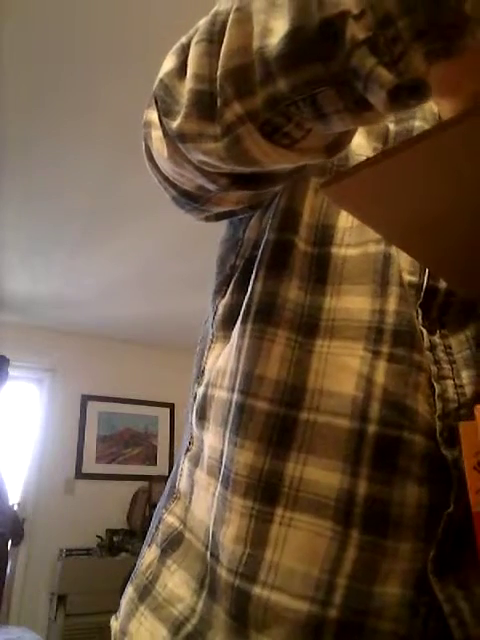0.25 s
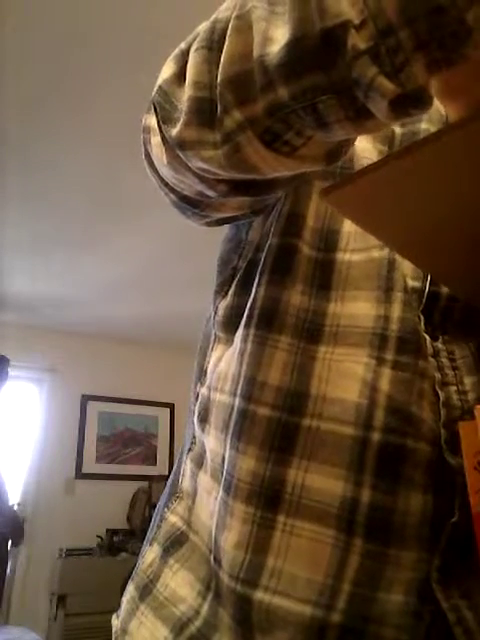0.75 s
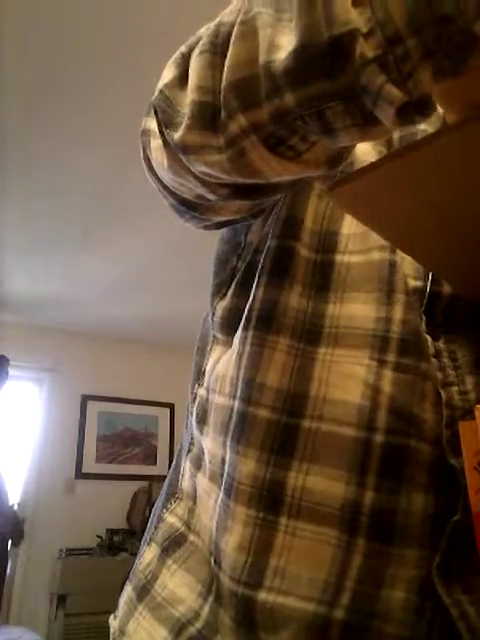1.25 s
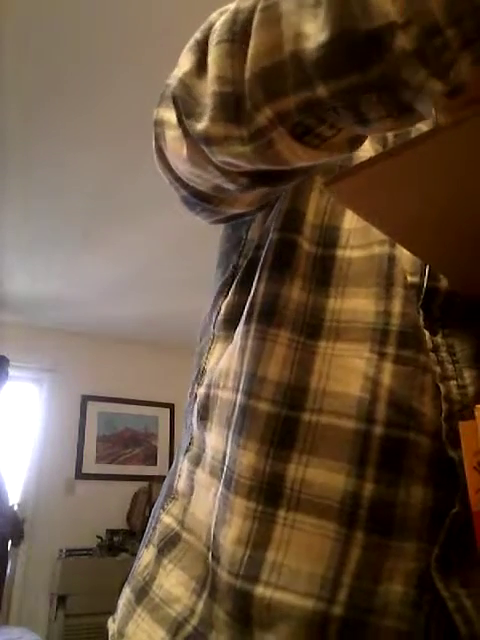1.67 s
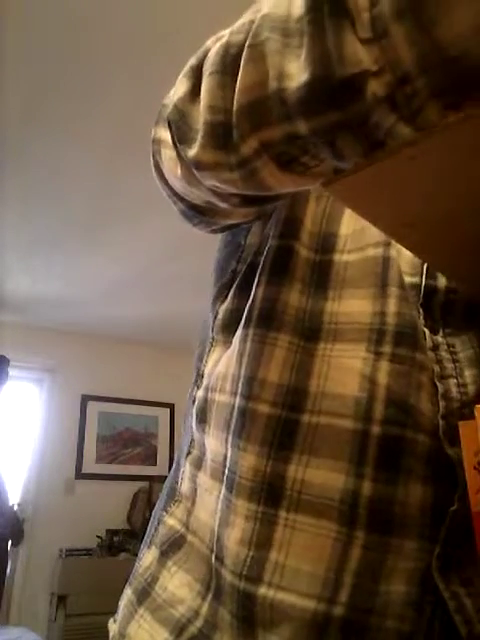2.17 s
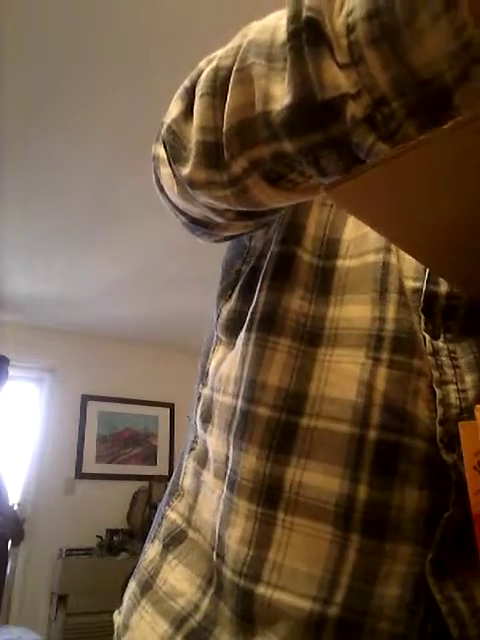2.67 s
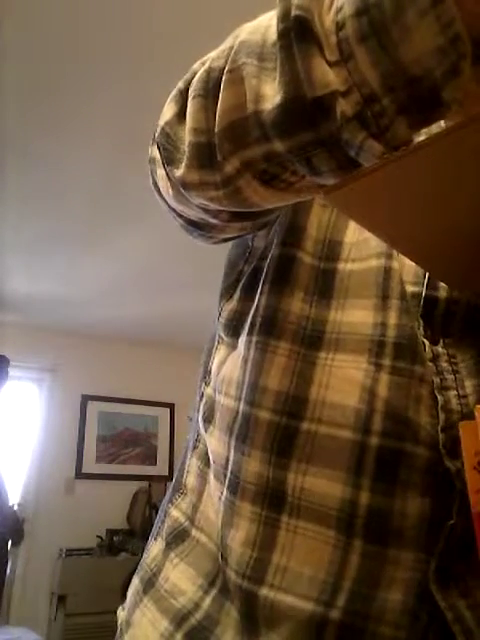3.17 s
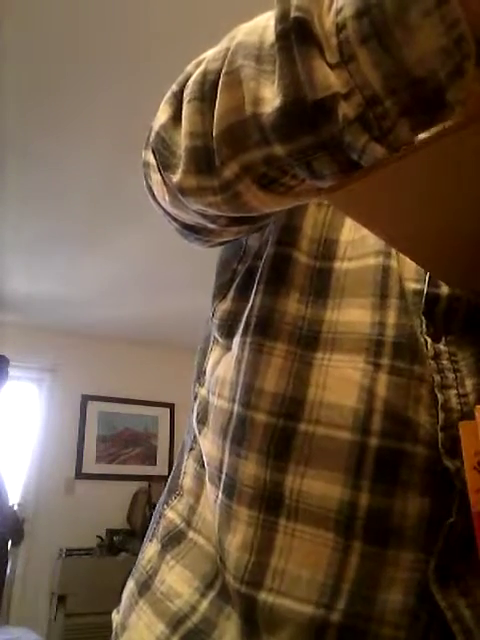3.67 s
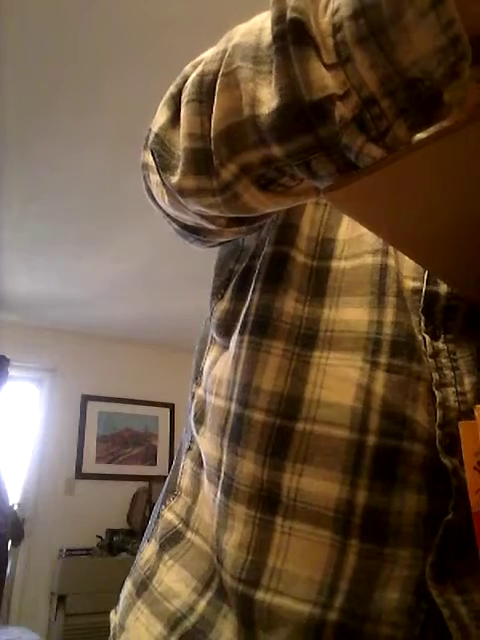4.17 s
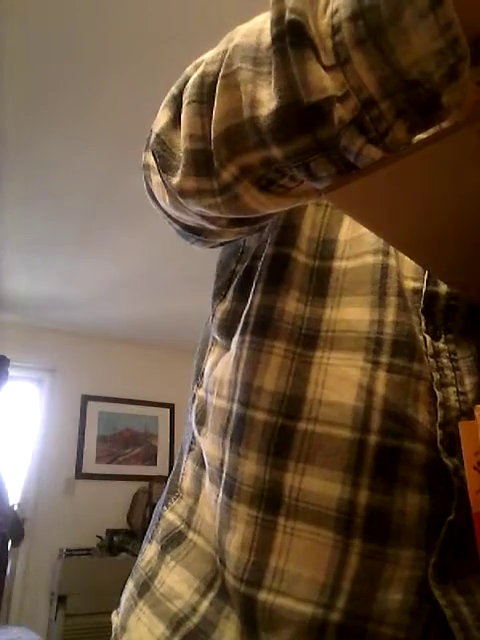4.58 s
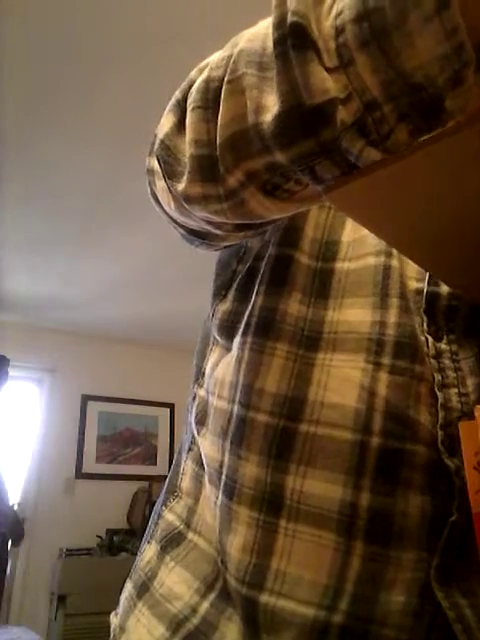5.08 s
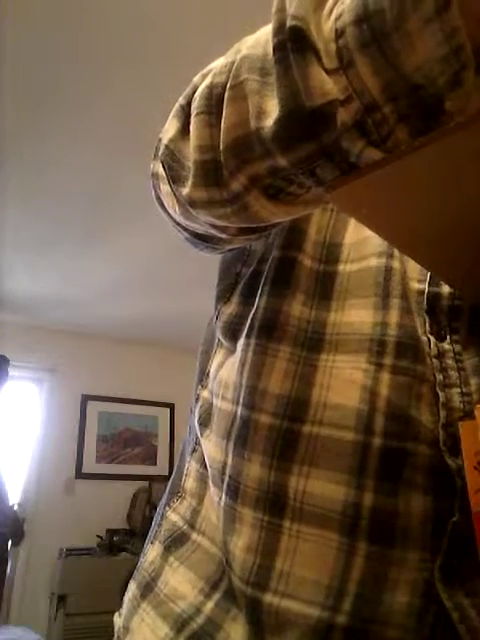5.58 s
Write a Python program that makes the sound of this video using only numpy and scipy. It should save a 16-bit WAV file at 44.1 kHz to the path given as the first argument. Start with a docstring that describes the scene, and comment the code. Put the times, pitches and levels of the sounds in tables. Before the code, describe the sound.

Close, right-leaning sound of cans and packets being shifted in a cardboard box. Short dry scrapes run almost continuously over a very faint room background. Boxy knocks come early, sliding dominates the middle, a sharp loud cluster of bangs lands past four seconds, and smaller thuds, a strong scrape and a last soft knock finish. Short, damped indoor echoes.

```python
"""Someone rummages through groceries in a cardboard box, close by and to the right, in a living room.
Over a faint diffuse background, goods slide from the start: streams of tiny slips excite the box.
Cans and cartons soon knock as well, each blow summing decaying modes, a panel slap and a noisy crack.
From half a second on, deep noise bursts shudder now and then; after a second, packets crinkle in
short bursts of snaps. The hardest blows fall past four seconds, and a last one ends the scene."""
import sys
import numpy as np
from scipy import signal
from scipy.fft import rfft, irfft
from scipy.io import wavfile
from scipy.ndimage import uniform_filter1d

SR = 44100
rng = np.random.default_rng(int(sys.argv[2]) if len(sys.argv) > 2 else 0)


def file_out(sig):
    """Save sig as 16-bit WAV at sys.argv[1]."""
    # one column per channel
    cols = np.atleast_2d(sig).T
    # limit, then scale
    lim = np.clip(cols, -1, 1)
    pcm = np.round(lim * 32767).astype(np.int16)
    wavfile.write(sys.argv[1], SR, pcm)


N = 257984
TIME = np.arange(N) / SR
HIT_TIME = TIME[:SR // 3]   # seconds since a blow, also the span of one echo pattern


def from_db(db):
    """Amplitude gain is the exponential of a level in decibels."""
    return 10 ** (np.asarray(db) / 20)


def rms_one(x):
    """Normalization to unit mean power."""
    return x / np.sqrt(np.mean(x ** 2) + 1e-20)


def blow_one(x):
    """Normalization of a transient to unit mean power over its first 25 ms."""
    return x / np.sqrt(np.mean(x[:SR // 40] ** 2) + 1e-20)


def at_hz(points, hz):
    """Linear interpolation of a table on a log-frequency axis."""
    f, value = np.transpose(points)
    return np.interp(np.log(np.maximum(hz, 1)), np.log(f), value)


def butter(x, hz, kind, order=2):
    """Causal Butterworth filtering."""
    return signal.sosfilt(signal.butter(order, hz, kind, fs=SR, output="sos"), x)


def colour(x, spectrum, size=2048):
    """Minimum-phase filtering: folding the cepstrum makes a given spectrum causal."""
    bins_hz = np.arange(size // 2 + 1) * SR / size
    cepstrum = irfft(np.log(from_db(at_hz(spectrum, bins_hz))))
    cepstrum[1:size // 2] *= 2
    cepstrum[size // 2 + 1:] = 0
    response = irfft(np.exp(rfft(cepstrum)))
    return signal.fftconvolve(x, response)[:len(x)]


def drift(rate):
    """Slow random modulation: smooth wander of unit spread through `rate` random points a second."""
    knots = rng.standard_normal(N // 20)
    return rms_one(np.interp(TIME * rate, np.arange(len(knots)), knots))


def resonate(x, hz, width):
    """Two-pole resonance with unit gain at its peak."""
    r = np.exp(-np.pi * width / SR)
    zeros = np.array([1, 0, -1]) * (1 - r * r) / 2
    poles = [1, -2 * r * np.cos(2 * np.pi * hz / SR), r * r]
    return signal.lfilter(zeros, poles, x)


def grains(per_s, spread_db):
    """Shot noise: impulses at random times, of uneven size and random sign."""
    sizes = from_db(spread_db * np.minimum(rng.exponential(1, N), 4))
    occurs = rng.random(N) < per_s / SR
    return rms_one(occurs * sizes * rng.choice([-1, 1], N))


def bursts(table):
    """Gating: a gain that is open during each row of start, length and level."""
    return sum(from_db(db) * ((TIME > s) & (TIME < s + length)) for s, length, db in table)


def ring(modes, weights, t, vary):
    """Modal superposition: each mode decays along t, its strength varying with the place of contact."""
    hz, db, t60 = np.array(modes).T[:, :, None]
    strength = 1 + vary * rng.uniform(-1, 1, (len(modes), 1))
    decay = from_db(db - 60 * t / t60)
    return weights @ (strength * decay * np.sin(2 * np.pi * hz * HIT_TIME))


# Likeness of diffuse sound at the two ports. Each row: frequency in Hz, correlation from -1 to 1.
LIKENESS = [(100, 0.66), (300, 1), (700, 0.91), (1400, -0.55), (3000, 0.35), (8000, -0.11)]


def diffuse_bands(size):
    """Diffuse-field coherence: yield (Hz, stereo noise) in half-octave bands of set correlation."""
    edges = np.geomspace(22, 17000, 20)
    for low, high in zip(edges, edges[1:]):
        mid, side = butter(rng.standard_normal((2, size)), [low, high], "band")
        hz = np.sqrt(low * high)
        alike = np.clip(at_hz(LIKENESS, hz), -1, 1)
        yield hz, np.sqrt(1 + alike) * mid + np.sqrt(1 - alike) * side * [[1], [-1]]


# Colour of the background. Each row: frequency in Hz, relative gain of the noise in dB.
BACKGROUND_COLOUR = [(25, 2), (60, 1.5), (130, 7.5), (300, -8.5), (1000, -6), (3500, -12.5), (7000, -20.5),
                     (15000, -18.5)]
BACKGROUND_DB = -65


def room_tone():
    """Stationary noise: a steady, faint diffuse background."""
    tone = sum(from_db(at_hz(BACKGROUND_COLOUR, hz)) * band for hz, band in diffuse_bands(N))
    return from_db(BACKGROUND_DB) * rms_one(tone)


STOP_DB_PER_S = 268   # how fast friction dies when a stroke ends


def stroke(start, run_up, hold, power=0.84):
    """Friction noise grows with sliding speed, holds, and dies as the thing comes to rest."""
    speed = np.clip((TIME - start) / run_up, 0, 1)
    after_hold = np.maximum(TIME - start - run_up - hold, 0)
    return speed ** power * from_db(-STOP_DB_PER_S * after_hold)


# Strokes, each one thing dragged along the cardboard. Each row: start in seconds, run-up in seconds,
# hold in seconds, then levels of surface hiss, panel rub and wall drumming in dB before their trims.
STROKES = [(0.0, 0.065, 0.14, -57.5, -53.5, -52), (0.233, .12, 0.16, -49.5, -53.5, -58),
           (0.56, 0.037, 0.11, -55, -55.5, -55), (0.892, 0.073, 0.014, -60, -61, -57),
           (1.146, 0.037, 0.017, -52, -50.5, -43), (1.202, 0.022, 0.052, -59.5, -57.5, -54),
           (1.276, 0.056, 0.12, -55, -63, -51), (1.372, 0.085, 0.097, -51, -63.5, -57),
           (1.63, .02, 0.0088, -55.5, -76, -62), (1.699, .01, 0.048, -55, -70, -61),
           (1.749, 0.038, 0.038, -57, -58.5, -61), (1.838, 0.06, 0.028, -50.5, -71, -48),
           (2.042, 0.052, 0.013, -46, -49, -41), (2.117, .02, .03, -51.5, -52.5, -55),
           (2.194, 0.084, 0.067, -60, -62, -55.5), (2.347, 0.11, 0.038, -52, -51.5, -53),
           (2.517, .1, 0.11, -50, -51, -57), (2.662, 0.15, .15, -46.5, -46.5, -49.5),
           (2.981, 0.039, 0.1, -52.5, -55.5, -50.5), (3.2, 0.15, 0.15, -47.5, -53.5, -64),
           (3.501, 0.1, .015, -47.5, -49.5, -65), (3.66, 0.027, .02, -50, -54, -48.5),
           (3.895, 0.056, 0.013, -57.5, -54, -53.5), (3.998, 0.026, 0.022, -53.5, -59, -55),
           (4.114, 0.047, 0.095, -53.5, -50, -47.5), (4.239, 0.069, 0.17, -48, -46, -45.5),
           (4.582, 0.058, 0.053, -49, -47, -58), (4.755, 0.05, 0.097, -52.5, -51.5, -53.5),
           (5.019, 0.015, 0.018, -54.5, -48.5, -56), (5.283, 0.074, .03, -57.5, -57, -60),
           (5.361, 0.082, 0.036, -44, -41.5, -51), (5.495, 0.014, 0.0096, -51.5, -50, -51),
           (5.662, 0.11, 0.031, -62, -55, -53.5)]
# The load never lies quite still. Levels at rest of hiss, rub and drumming in dB before their trims.
REST_DB = (-70, -68.5, -65)


def friction_gains():
    """Incoherent addition: overlapping strokes add in power, for hiss, rub and drumming alike."""
    power = from_db(REST_DB)[:, None] ** 2
    for start, run_up, hold, *levels_db in STROKES:
        power = power + np.outer(from_db(levels_db), stroke(start, run_up, hold)) ** 2
    return np.sqrt(power)


# Main surface hiss. Each row: frequency in Hz, spectral level in dB per Hz.
HISS = [(600, -3), (1300, -5.5), (2200, 2.5), (3000, 4), (3700, 4.5), (4700, -3.5), (6000, -13),
        (8000, -17), (11000, -41), (15500, -23)]
# Fine hiss of a light, fast touch. Each row: frequency in Hz, spectral level in dB per Hz.
SHEEN = [(2000, -7.5), (3500, -21), (5000, 4.5), (6500, -5.5), (9000, -10.5), (15000, -23)]


def surface_hiss(lightness_db, sheen_db=-12, sheen_rise=0.43, grain_db=2.0):
    """Broadband friction noise: a lighter touch makes the hiss finer, and its level flickers."""
    coarse, fine = [rms_one(butter(colour(rng.standard_normal(N), c), 520, "high")) for c in (HISS, SHEEN)]
    fine_gain = from_db(sheen_db + sheen_rise * lightness_db)
    return (coarse + fine_gain * fine) * from_db(grain_db * drift(450))


# Broad colour of the panel rub. Each row: frequency in Hz, spectral level in dB per Hz.
RUB = [(250, -4), (450, -13), (620, -10), (850, -0.5), (1200, -4.5), (1900, -1.5), (3000, -10.5),
       (6000, -60)]
# Resonances that rubbing brings out of the panels. Each row: frequency in Hz, width in Hz, level in dB.
RUB_PEAKS = [(605, 55, 0), (780, 70, -6), (1150, 80, -4), (1850, 220, -8)]
TAPS_PER_S, TAP_DB = 22, -9.5   # light taps of jostled goods; their level against the panel rub


def panel_rub(peaks_db=-3):
    """Forced resonance: a stream of slips excites the panels, and jostled goods tap them."""
    slips = grains(per_s=8000, spread_db=2.5)
    peaks = rms_one(sum(from_db(db) * resonate(slips, hz, width) for hz, width, db in RUB_PEAKS))
    broad = rms_one(butter(colour(slips, RUB), 187, "high"))
    return rms_one(broad + from_db(peaks_db) * peaks) + from_db(TAP_DB) * taps()


def taps():
    """Random impacts: jostled goods touch the panels, each touch repeating one knock."""
    touches = grains(per_s=TAPS_PER_S, spread_db=1.0)
    return rms_one(signal.oaconvolve(touches, knock(HIT_TIME))[:N])


# Slow modes of the loaded box. Each row: frequency in Hz, level in dB, 60 dB decay time in seconds
# (a blow stretches it by its ring share; drumming turns it into a resonance width).
BOX_MODES = [(71, 4, 0.23), (127.8, 3, 0.069), (130.3, 4, 0.16), (157, -2.5, 0.14), (221.5, 5.5, 0.085),
             (252, -11.5, 0.16), (309.8, -5, 0.13)]


def wall_drumming():
    """Forced vibration: sparser slips drive the slow modes of the box."""
    push = butter(grains(per_s=2600, spread_db=2.16), 180, "high")
    return rms_one(sum(from_db(db) * resonate(push, hz, 4 / t60) for hz, db, t60 in BOX_MODES))


def sliding(hiss_trim_db=-1, rub_trim_db=-1, drum_trim_db=-1, unsteady_db=0.6):
    """Friction is a stream of tiny slips: it hisses, excites the panels and drums the walls."""
    hiss_gain, rub_gain, drum_gain = friction_gains()
    grip = from_db(.8 * drift(70) + unsteady_db * drift(18))
    # the lighter the touch, the less the panels answer and the finer the hiss
    lightness_db = np.clip(20 * np.log10(hiss_gain / rub_gain), -10, 10)
    hiss = hiss_gain * from_db(hiss_trim_db) * surface_hiss(lightness_db)
    rub = rub_gain * from_db(rub_trim_db) * panel_rub()
    drum = drum_gain * from_db(drum_trim_db) * wall_drumming()
    return grip * (hiss + rub + drum)


def thump(pitch_hz, age, octaves=0.58, rise_s=0.0017, leak_hz=100):
    """Contact time favours the modes near one pitch; the thump carries no deep bass."""
    distance = np.log2(np.array(BOX_MODES)[:, 0] / pitch_hz) / octaves
    body = ring(BOX_MODES, 1 / (1 + distance ** 2), age, vary=0.12)
    push = 1 - np.exp(-HIT_TIME / rise_s)
    return blow_one(butter(body * push, max(leak_hz, .55 * pitch_hz), "high", order=4))


# Modes of the stiff cardboard panels. Each row: frequency in Hz, level in dB, 60 dB decay time in
# seconds (a blow stretches it by its ring share).
PANEL_MODES = [(422.7, 1.5, 0.099), (525, -1, 0.13), (612, 7, 0.051), (700, 3.5, 0.05), (765, 3.5, 0.042),
               (909, 2.5, 0.073), (1071, 2.5, 0.085), (1120, -36, 0.07), (1505, 0, 0.036),
               (1610, 5.5, 0.035), (1900, -9, 0.11)]


def knock(age, slap_db=1, slap_t60=0.0088, clatter_db=-3, clatter_t60=0.014):
    """Plate vibration: the panel slaps, its many damped modes clatter, and a few ring on."""
    signs = rng.choice([-1, 1], len(PANEL_MODES))
    swing = np.sin(2 * np.pi * 700 * HIT_TIME)
    slap = blow_one(swing * from_db(-60 * HIT_TIME / slap_t60))
    fading_noise = rng.standard_normal(len(HIT_TIME)) * from_db(-60 * age / clatter_t60)
    clatter = blow_one(butter(fading_noise, [480, 1400], "band"))
    ringing = blow_one(ring(PANEL_MODES, signs, age, vary=0.6))
    panel = ringing - from_db(slap_db) * slap + from_db(clatter_db) * clatter
    return blow_one(butter(panel, [380, 2800], "band"))


# Colour of a hard edge's crack. Each row: frequency in Hz, spectral level in dB per Hz.
CRACK = [(500, -5), (1000, 4.5), (1700, 6), (2600, 3), (3500, 4), (4800, -9.5), (7500, -21), (10000, -29.5),
         (15000, -59)]


def crack(snap_t60=0.021, inside_db=-13, inside_t60=0.022, edge_db=-3):
    """Impulsive contact: a hard edge pulses once, crackles, and the sound bounces inside the box."""
    envelope = from_db(-60 * HIT_TIME / snap_t60) + from_db(inside_db - 60 * HIT_TIME / inside_t60)
    crackle = blow_one(envelope * rng.standard_normal(len(HIT_TIME)))
    pulse = blow_one(signal.unit_impulse(len(HIT_TIME)))
    force = crackle - from_db(edge_db) * pulse
    return blow_one(butter(colour(force, CRACK), 660, "high"))


# Blows; heavy, soft things thump low. Each row: start in seconds, thump level in dB, thump pitch in Hz,
# knock level in dB, crack level in dB before its trim, ring time as a share of the free box's.
KNOCKS = [(0.087, -44.5, 151, -48.5, -73, 2.4), (0.2321, -36, 222, -38.5, -54.5, 1.4),
          (0.353, -70, 594, -43.5, -46, 1.2), (0.529, -39.5, 263, -49.5, -56, 1.9),
          (0.545, -39, 191, -36, -36, 1.9), (0.581, -37, 174, -57, -87, 1.3),
          (0.623, -42.5, 221, -43, -61, 1.2), (0.7618, -37.5, 244, -31, -38.5, 1.87),
          (0.794, -65, 420, -45, -45.5, 0.64), (0.808, -56, 300, -46.5, -55, 0.75),
          (1.216, -33, 190, -46, -77, 0.95), (1.8887, -48.5, 538, -44.5, -37, 1.3),
          (2.101, -37.5, 145, -43, -48, 0.57), (2.321, -42.5, 168, -44.5, -72, 1.8),
          (2.332, -43, 168, -47.5, -74, 1.8), (2.974, -35.5, 376, -39.5, -45.5, 1.07),
          (2.987, -45, 348, -62, -47, 0.59), (3.0162, -44.5, 135, -41.5, -51, 2),
          (3.619, -47.5, 201, -51.5, -52, 1.6), (3.695, -52, 197, -43.5, -74, 2.4),
          (3.787, -44, 184, -51.5, -70, 1.45), (4.177, -40, 135, -56, -65, 0.78),
          (4.21, -38.5, 129, -61, -48, 1.3), (4.237, -37.5, 120, -62, -53, 2.1),
          (4.325, -43, 314, -60, -53, 0.65), (4.3593, -26, 290, -24, -40.5, 1.3),
          (4.3692, -40, 484, -22, -25, 0.96), (4.436, -31.5, 263, -25, -28, 0.54),
          (4.4413, -47, 217, -28, -62, 0.43), (4.644, -47, 190, -42, -48, 1.4),
          (4.6732, -51, 473, -48, -38.5, 0.8), (4.8132, -28.5, 257, -44, -38, 0.76),
          (4.859, -41, 150, -53, -67, 0.88), (4.968, -65, 138, -56.5, -51.5, 1.8),
          (5.0319, -60, 223, -48, -49, 0.3), (5.483, -32.5, 208, -41, -66, 0.5),
          (5.84, -47, 210, -51, -58, 1.0)]


def blows(thump_trim_db=0, knock_trim_db=0, crack_trim_db=1):
    """Impact excitation: each blow superposes a thump, a knock and a crack."""
    out = np.zeros(N + len(HIT_TIME))
    for s, thump_db, pitch_hz, knock_db, crack_db, ring_share in KNOCKS:
        start = int(s * SR)
        age = HIT_TIME / ring_share   # a thing that stays pressed on the wall damps it sooner
        blow = from_db(thump_db + thump_trim_db) * thump(pitch_hz, age)
        blow += from_db(knock_db + knock_trim_db) * knock(age)
        blow += from_db(crack_db + crack_trim_db) * crack()
        out[start:start + len(HIT_TIME)] += blow
    return out[:N]


# The whole box shifts and the table under it shudders. Each row: start in seconds, length in seconds,
# level in dB.
SHUDDERS = [(.53, 0.053, -47), (1.16, 0.04, -45.5), (1.68, 0.025, -47), (1.89, 0.066, -55.5),
            (3.0, 0.051, -53), (4.36, 0.053, -41.5), (4.82, 0.044, -49)]


def shudders(low_hz=40, high_hz=95):
    """Low-frequency structural vibration: brief bursts of deep noise with softened edges."""
    envelope = uniform_filter1d(bursts(SHUDDERS), size=SR // 80)
    return envelope * rms_one(butter(rng.standard_normal(N), [low_hz, high_hz], "band"))


# Packets that buckle under the hand. Each row: start in seconds, length in seconds, level in dB.
CRINKLES = [(1.169, 0.024, -43), (1.704, .008, -51), (2.083, 0.03, -42), (4.162, 0.0024, -34),
            (4.175, 0.012, -34.5), (4.199, .016, -40.5), (4.802, 0.02, -46), (5.465, .01, -38)]
# Colour of the buckling snaps. Each row: frequency in Hz, spectral level in dB per Hz.
CRINKLE = [(500, -0.5), (1200, -6.5), (2200, 3), (3200, 1.5), (4100, 7), (5200, -7.5), (8000, -19),
           (15000, -71)]


def crinkles():
    """Buckling: a creasing packet gives off a short burst of bright snaps."""
    snaps = grains(per_s=2200, spread_db=1.5)
    coloured = colour(bursts(CRINKLES) * snaps, CRINKLE)
    return butter(coloured / np.std(colour(snaps, CRINKLE)), 270, "high")


# The left port lies in the shadow of the device. Each row: frequency in Hz, gain in dB.
SHADOW = [(250, -3.5), (500, -5), (1100, -8), (2500, -11), (5000, -18), (12000, -18)]


def ports(x, lag_s=0.00012):
    """Interaural-style cues: direct sound reaches the left port later and shadowed."""
    left = np.interp(TIME - lag_s, TIME, colour(x, SHADOW))
    return np.array([left, x])


# Decay of the room's tail. Each row: frequency in Hz, 60 dB decay time in seconds.
ROOM_T60 = [(100, 0.93), (300, 0.32), (1000, 0.32), (3500, 0.27), (12000, 0.6)]


def echoes(bass_db=-8, build_s=0.00068, near_db=3, near_t60=0.071):
    """Reverberant decay: quick echoes off box and table, then a furnished room's tail, weak in bass."""
    near = from_db(near_db - 60 * HIT_TIME / near_t60)
    tail = 0
    for hz, band in diffuse_bands(len(HIT_TIME)):
        far = from_db(-60 * HIT_TIME / at_hz(ROOM_T60, hz))
        bass_gain = from_db(bass_db / (1 + (hz / 450) ** 2))   # so close by, the bass echoes less
        tail = tail + band * (near + far) * bass_gain
    tail = tail * (1 - np.exp(-(HIT_TIME / build_s) ** 2))
    return tail / np.sqrt(np.sum(tail ** 2) / 2)


def room(x, wet_db=-10.0, count=4):
    """Time-varying reverberation: arm and goods keep moving, so sound passes between echo patterns."""
    # the patterns take turns in a cycle, 20 of them a second
    shares = [np.interp(TIME * 20, np.arange(count), row, period=count) for row in np.eye(count)]
    wet = 0
    for share in shares:
        sent = x * np.sin(share * np.pi / 2)   # equal-power crossfade
        wet = wet + signal.oaconvolve(sent[None], echoes(), axes=1)[:, :N]
    return from_db(wet_db) * wet


def scene(slide_wet_db=2):
    """Direct and reverberant paths: blows pass the near wall, friction leaves by the open top, wetter."""
    hits = blows()
    friction = sliding() + crinkles()
    direct = ports(hits + friction + shudders())
    reverberant = room(hits + from_db(slide_wet_db) * friction)
    return direct + reverberant + room_tone()


CUTOFF_HZ = 16100


def record(dry):
    """Band limiting: a gentle slope cuts the deep bass and a steep one the top."""
    no_deep_bass = butter(dry, 30, "high", order=1)
    return signal.sosfilt(signal.cheby2(18, 60, CUTOFF_HZ, fs=SR, output="sos"), no_deep_bass)


dry = scene()
out = record(dry)
file_out(out)
```